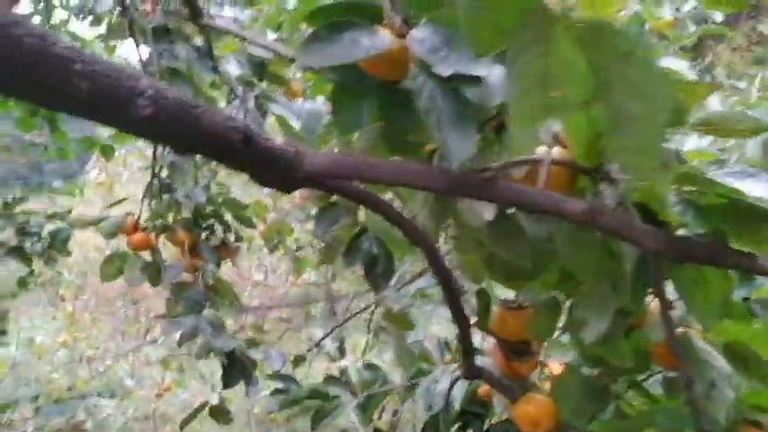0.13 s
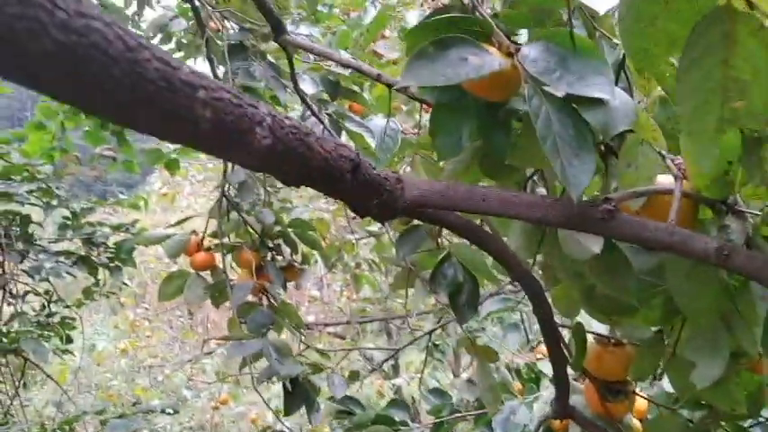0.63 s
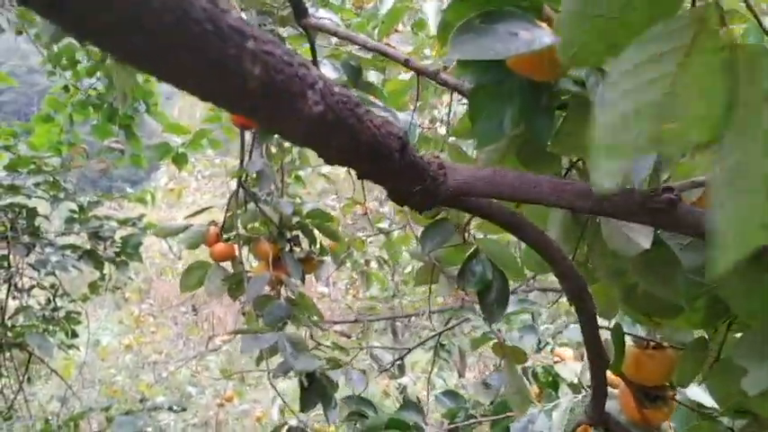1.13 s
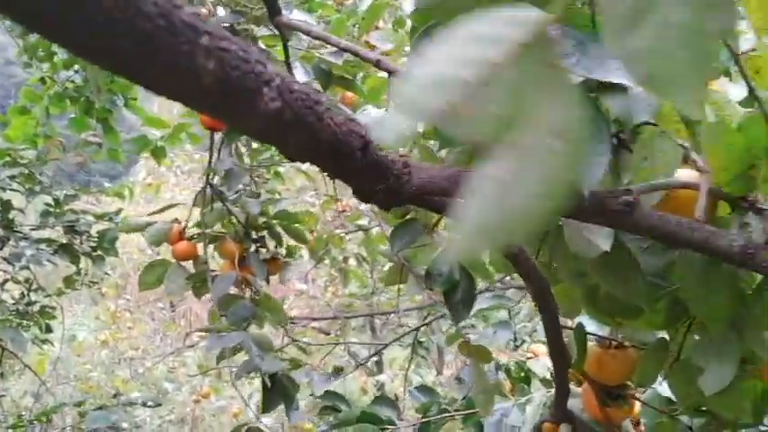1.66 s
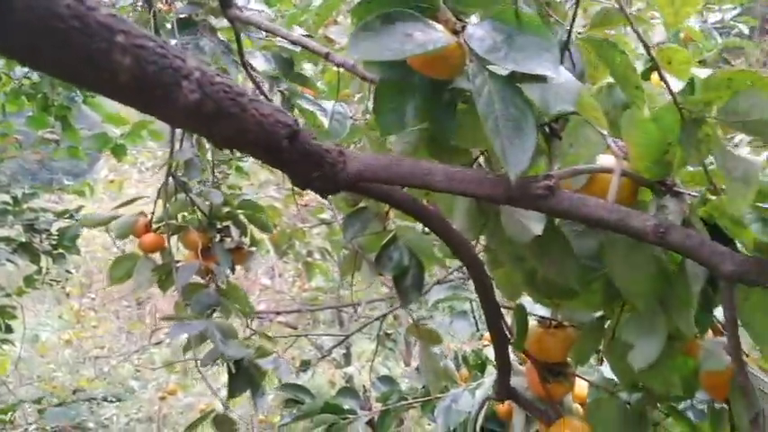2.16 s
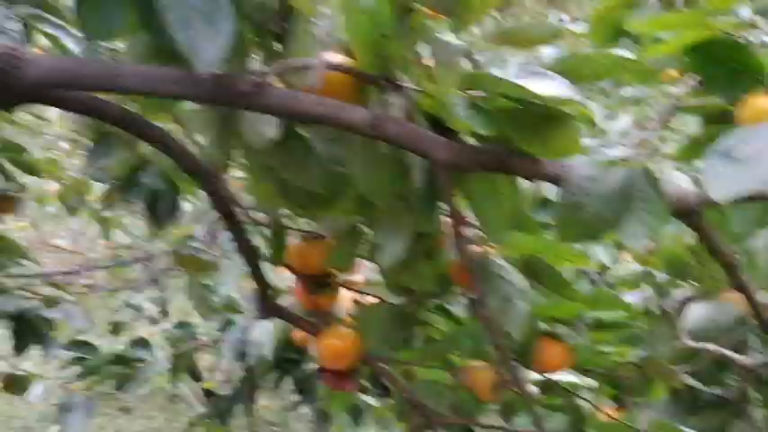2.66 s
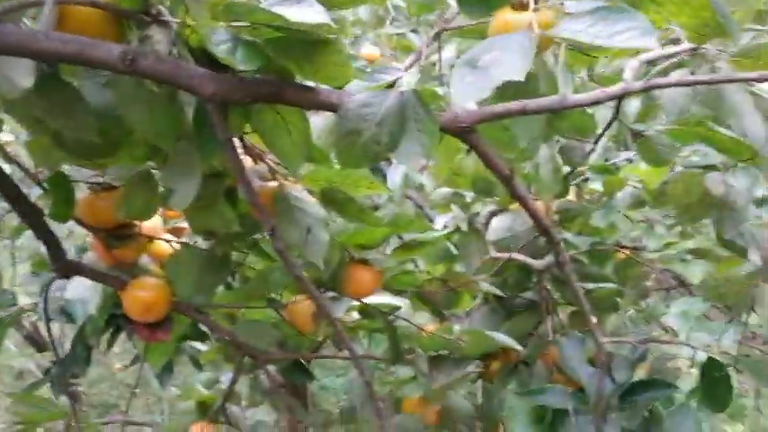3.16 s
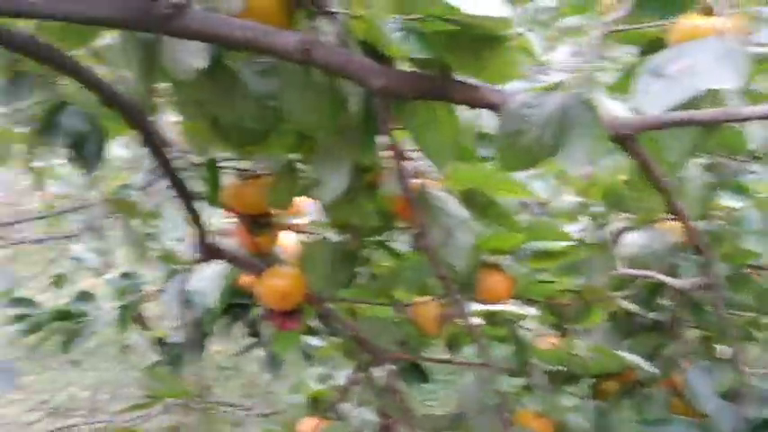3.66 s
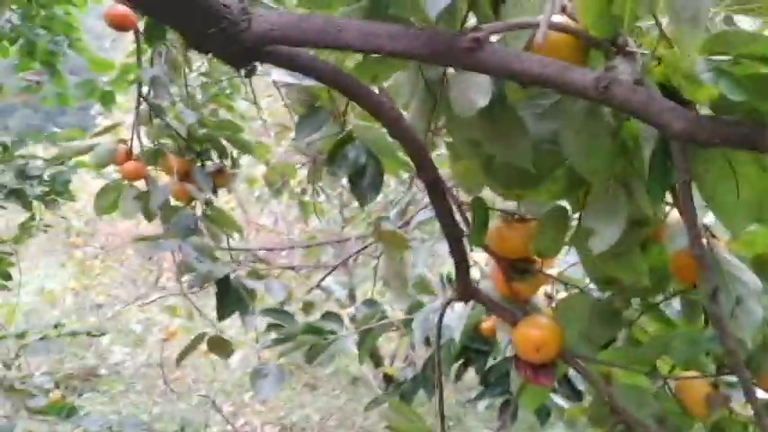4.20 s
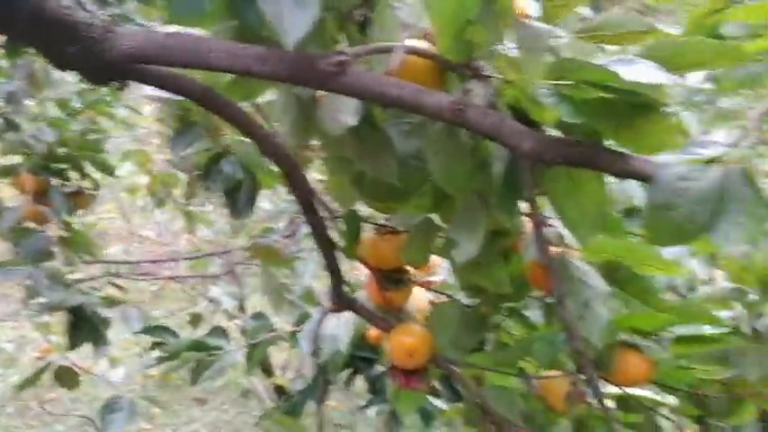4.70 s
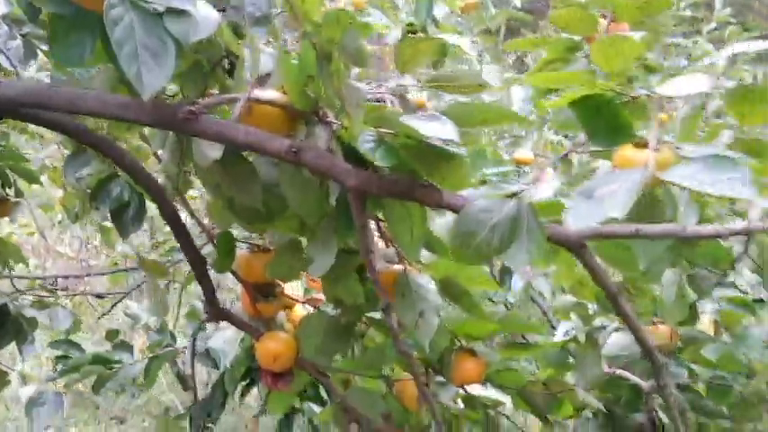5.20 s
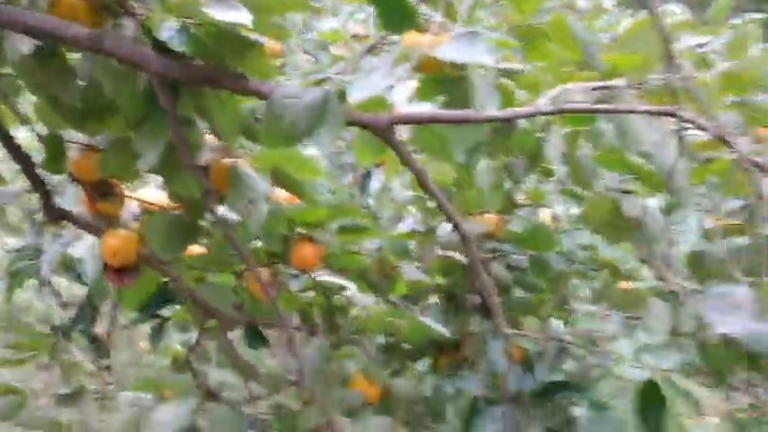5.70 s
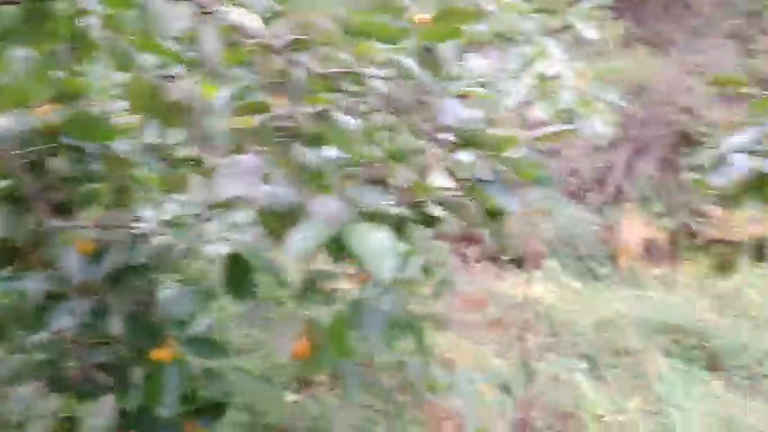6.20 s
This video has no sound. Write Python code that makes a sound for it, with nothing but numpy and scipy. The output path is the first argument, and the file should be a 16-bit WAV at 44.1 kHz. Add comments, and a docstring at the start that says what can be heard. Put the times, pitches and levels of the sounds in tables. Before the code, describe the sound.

Someone pushes through orchard branches: dry leafy brushing, small twig clicks, a single hard crack, bark scrapes and bumps, then near quiet.

```python
"""Stiff leaves of a fruit tree, pushed aside close to a small camera, brush and crackle: noise broken into
many brief contacts. Boughs scrape and bump the same way; twigs tick and snap, one loudly, as bursts of noise.
Dull low thuds of the wood, short noise pulses, mostly sound together with the snaps; rubbing stems squeak as
narrow bands of noise round one pitch. Air puffs thump mostly one microphone port at a time, over the faint
hush of open air. The camera delivers its right channel a few milliseconds late."""
import sys
import numpy as np
from scipy import signal
from scipy.fft import rfft, irfft, next_fast_len
from scipy.io import wavfile
from scipy.ndimage import uniform_filter1d, map_coordinates

SR = 44100
rng = np.random.default_rng(int(sys.argv[2]) if len(sys.argv) > 2 else 0)


def to_linear_factor(level_db):
    """Convert decibel levels (scalar or array-like) to linear amplitude factors."""
    exponent = np.asarray(level_db, float) / 20
    return 10 ** exponent


def waveform_to_disk(signal):
    """Save audio, clipped to [-1, 1], as 16-bit WAV at the path in sys.argv[1]."""
    frames = np.transpose(np.atleast_2d(signal))
    scaled = np.clip(frames, -1, 1) * 32767
    samples = np.round(scaled).astype(np.int16)
    wavfile.write(sys.argv[1], SR, samples)


N = 279594  # samples

# Motion of the brushing leaves as hands push through:
# t/s, level of the leaf body/dB, fizz over body/dB, mean left minus right/dB
LEAF_MOTION = [(0, -62, 0.5, -1.5), (.14, -52.5, 5, -4), (.3, -69.5, -3.5, -2), (.5, -77.5, 1.5, -5.5),
               (.72, -70.5, -8.5, -1.5), (.86, -62, -9, -5), (.96, -67.5, -4, -5), (1.03, -47.5, 4, 1),
               (1.1, -53.5, 3, -2.5), (1.24, -51.5, -2, -4), (1.32, -64.5, 1, -2), (1.39, -55.5, -9, 0),
               (1.47, -68.5, -7, -10), (1.53, -62, -3, -1), (1.66, -69.5, 0.5, -3), (1.75, -57, 1.5, -3),
               (1.87, -53.5, -7.5, -4.5), (2.07, -50, 1, -6.5), (2.12, -36, -.5, -5), (2.26, -42, -1.5, 0),
               (2.3, -37.5, 2.5, -1.5), (2.37, -45.5, -.5, -9), (2.47, -47.5, -1, 1.5),
               (2.58, -57.5, -.5, -1.5), (2.65, -57, -3.5, 4), (2.7, -58, -2.5, -2), (2.79, -45.5, -4, 15),
               (2.84, -60.5, -4.5, 0), (2.98, -59, 0, 5.5), (3.03, -51, 3, 4), (3.2, -57.5, 2, 7.5),
               (3.38, -61.5, 3.5, -2), (3.63, -61, 0.5, 4.5), (3.73, -44.5, 0, 0.5), (3.87, -67.5, -1, 1),
               (3.99, -73, 4, -7), (4.06, -63.5, 6, -3), (4.18, -71, -1, -1), (4.34, -76.5, -0.5, -1),
               (4.43, -66, 1.5, -2.5), (4.63, -84, -1.5, 3.5), (4.75, -66.5, 5, -3.5),
               (5.03, -56, 1.5, -8.5), (5.17, -64, 5, -5), (5.3, -75, 2, -4), (5.35, -64.5, 9.5, -1),
               (5.42, -72, -1, -8), (5.49, -59, 7, 1), (5.7, -70.5, 10, -5.5), (5.9, -65.5, 3, 0),
               (6.0, -60.5, 4.5, -4), (6.13, -80, 5.5, -1), (6.2, -72, 11, -3), (6.34, -68, 7, -4.5)]


def unit(x):
    """Normalisation: scales a signal to an rms of 1."""
    return x / np.sqrt(np.mean(x ** 2) + 1e-20)


def along(points, hz):
    """Logarithmic frequency scale: interpolates (f/Hz, value) points along it."""
    f, v = np.transpose(points)
    return np.interp(np.log(hz + 1), np.log(f + 1), v)


def curves(rows):
    """Linear interpolation in time: one value per sample for each column after t/s."""
    s, *cols = np.transpose(rows)
    return [np.interp(np.arange(N) / SR, s, c) for c in cols]


def wobble(rate):
    """Band-limited random fluctuation: a smooth curve through rate random knots a second."""
    knots = rng.standard_normal(int(N * rate / SR) + 4)
    return map_coordinates(knots, [np.arange(N) * rate / SR])


def filtered(x, response):
    """Linear filtering: multiplies the spectrum of x by a response of frequency."""
    m = next_fast_len(x.shape[-1] + 4096)
    spectrum = rfft(x, m) * response(np.fft.rfftfreq(m, 1 / SR))
    return irfft(spectrum, m)[..., :x.shape[-1]]


def sides(pan_db):
    """Interchannel level difference: left and right gains whose mean power stays 1."""
    return to_linear_factor(np.array([pan_db, -pan_db]) / 2) / np.sqrt(np.cosh(pan_db * np.log(10) / 20))


def add(out, s, sound):
    """Superposition: mixes a sound in at time s."""
    start = round(s * SR)
    out[:, max(start, 0):start + sound.shape[1]] += sound[:, max(-start, 0):]


def at_ports(pair, gain):
    """Interchannel coherence: blends two unrelated signals to a set left-right likeness, then colours them."""
    # Likeness of the two ports, highest in the low mids: f/Hz, correlation of left and right
    alike = [(50, 0.18), (200, 0.86), (800, 0.71), (1300, 0.1), (3000, 0.6), (10000, 0.3)]

    def mid_side(hz):
        turn = np.arccos(np.clip(along(alike, hz), 0, 1)) / 2
        return gain(hz) * np.array([np.cos(turn), np.sin(turn)])

    mid, side = filtered(pair, mid_side)
    return unit(np.array([mid + side, mid - side]))


def patched(x, depth_db, size):
    """Time-frequency modulation: random gain in small patches; a long window gives narrow, ringing ones."""
    z = signal.stft(x, nperseg=size)[2]
    field = uniform_filter1d(rng.standard_normal(z.shape), size=3, axis=1)
    field = uniform_filter1d(field, size=3, axis=2)
    gain_db = depth_db * np.tanh(unit(field) / 2) * 2
    return signal.istft(z * to_linear_factor(gain_db), nperseg=size)[1][:, :N]


def rustle(spectrum, contacts, spread_db, life_s, patchy_db, ringing_db):
    """Shot noise: random contacts (mean number a second) of unequal size, decaying in energy over life_s."""
    noise = patched(rng.standard_normal((2, N)), patchy_db, size=256)
    noise = patched(noise, ringing_db, size=1024)
    strength = to_linear_factor(2 * spread_db * rng.exponential(size=N).clip(0, 4))
    touch = (rng.random(N) < contacts / SR) * strength
    energy = signal.lfilter([1], [1, -np.exp(-1 / (life_s * SR))], touch)
    grains = noise * np.sqrt(energy / energy.mean() + 1.6)  # 1.6: steady rubbing under the contacts
    return at_ports(grains, lambda hz: to_linear_factor(along(spectrum, hz)))


def leaves():
    """Sliding friction of stiff leaves: shot noise in a body and a finer fizz that flutter together."""
    # Spectra of body and fizz: f/Hz, relative density/dB per Hz
    body_spectrum = [(900, -18), (1800, -4.5), (2500, -0.5), (4000, -1), (6000, -2.5), (8000, -13),
                     (11000, -34)]
    fizz_spectrum = [(4500, -15.5), (6500, 3.5), (8300, 3.5), (11600, 1.5), (16000, 0)]
    level_db, bright_db, pan_db = curves(LEAF_MOTION)
    flutter_db = 1.2 * wobble(25) + 1.4 * wobble(70)
    body = rustle(body_spectrum, contacts=560, spread_db=3, life_s=.0012, patchy_db=2.5, ringing_db=5)
    fizz = rustle(fizz_spectrum, contacts=1200, spread_db=3, life_s=.0008, patchy_db=2.5, ringing_db=2)
    brushing = body + to_linear_factor(bright_db + 1.5 * wobble(15)) * fizz
    return sides(pan_db + 4.54 * wobble(18)) * to_linear_factor(level_db + flutter_db) * brushing


def boughs():
    """Friction and impact: bark scrapes in short contacts, heavier limbs and fruit bump in duller, longer ones."""
    # Motion of the boughs: t/s, bark scrape level/dB, limb bump level/dB
    motion = [(0, -52.5, -68), (.05, -67.5, -70.5), (.23, -71.5, -69.5), (.41, -79.5, -84),
              (.8, -75, -81.5), (1.08, -77, -73), (1.31, -78, -77), (1.48, -70, -70.5), (1.78, -88, -74.5),
              (1.91, -59.5, -72), (2.05, -70.5, -71), (2.14, -45.5, -61), (2.24, -58, -60.5),
              (2.29, -47, -57), (2.54, -57, -58.5), (2.68, -75, -82), (2.76, -64, -60), (2.9, -68, -71),
              (3.07, -47.5, -61.5), (3.16, -50.5, -54), (3.23, -78, -65), (3.29, -63.5, -67),
              (3.5, -72, -68), (3.71, -57.5, -62.5), (3.83, -61, -68), (4.15, -75.5, -74.5),
              (4.47, -84, -91.5), (4.75, -76.5, -78), (5.04, -63.5, -66.5), (5.35, -79, -81),
              (5.5, -73.5, -65.5), (5.86, -70, -72), (6.08, -77, -80), (6.34, -77.5, -70.5)]
    # Spectra of scrape and bump: f/Hz, relative density/dB per Hz
    bark_spectrum = [(350, -26.5), (650, -7), (1050, -2.5), (1500, -8.5), (2000, -7.5), (3500, -35)]
    limb_spectrum = [(70, -37.5), (150, -9.5), (300, -1.5), (500, -2.5), (800, -15), (1500, -39.5)]
    scrape_db, bump_db = curves(motion)
    pan_db = 0.5 + 0.26 * curves(LEAF_MOTION)[2]  # follows a share of the leaves' side-to-side move
    scrape = rustle(bark_spectrum, contacts=250, spread_db=1.5, life_s=.005, patchy_db=2.5, ringing_db=4)
    bump = rustle(limb_spectrum, contacts=19, spread_db=1.0, life_s=.015, patchy_db=-0.5, ringing_db=3.5)
    return sides(pan_db) * to_linear_factor(1.8 * wobble(15)) * (to_linear_factor(scrape_db) * scrape + to_linear_factor(bump_db) * bump)


def ticks(count):
    """Random point process: rows of small ticks at chance times, their level tied to that of the leaves."""
    over_leaves_db, scatter_db, pan_scatter_db = 5, 2.5, 5
    centre_hz, scatter_octaves, focus_octaves = 4500, .6, .6
    length_ms, length_octaves = 1.6, 0.93
    level_db, _, pan_db = curves(LEAF_MOTION)
    when = rng.random(count) * (N - 1)
    at = when.astype(int)
    g = rng.standard_normal((count, 4))
    return np.transpose([when / SR,
                         level_db[at] + over_leaves_db + scatter_db * g[:, 0],
                         pan_db[at] + pan_scatter_db * g[:, 1],
                         centre_hz * 2 ** (scatter_octaves * g[:, 2]),
                         np.full(count, focus_octaves),
                         length_ms * 2 ** (length_octaves * g[:, 3])])


def snaps():
    """Brittle fracture: each break is a ragged, fast-decaying noise burst focused round its own frequency."""
    # Twig snaps: t/s, level/dB, left minus right/dB, crack centre f/Hz,
    # offset at which the focus is 4 dB down/octaves, time of a 12 dB decay/ms
    breaks = [(.2671, -50.5, -8, 1920, 1.5, 3.3), (.7677, -56.5, -2, 3320, 0.53, 11),
              (.8858, -54, 0, 2190, 0.85, 9.2), (.9972, -40, -4, 2760, 0.31, 1.3),
              (1.0254, -42, -4, 5560, 1.3, 18), (1.0375, -39.5, -2, 8200, .97, 3.3),
              (1.0491, -33.5, -12, 7300, 0.57, 2.4), (1.0579, -38, 8, 6100, .92, 4.5),
              (1.1383, -29, 2.5, 6050, 1.3, 6.4), (1.1489, -44, -4, 5800, 0.4, 37),
              (1.2305, -32, -3.5, 4150, 1.15, 3), (1.249, -29.5, -2, 8350, 0.44, 1.3),
              (1.2743, -34.5, 3, 5100, 1.05, 4.8), (1.4104, -33.5, -3, 4470, 1.08, 4.9),
              (1.4204, -42, -1, 2800, 1.04, 4), (1.5124, -46, -16.5, 4380, .16, 5.8),
              (1.5311, -34.5, -9, 4960, 1.14, 1.76), (1.6893, -43, -1, 4700, 0.61, 3.4),
              (1.7301, -38, -11.5, 9100, .52, 7.8), (1.8087, -51, 2, 1470, .87, 13),
              (1.8196, -36.5, -6, 1830, 0.8, 2.9), (1.9374, -41, -1.5, 6200, 1.3, 8.9),
              (2.041, -46, 11, 5000, 0.87, 5.3), (2.0969, -10, 1.5, 4900, 1.2, 3.9),
              (2.1232, -19, -5.5, 4170, 0.69, 2.3), (2.204, -27.5, -5.5, 2160, 1.3, 5.6),
              (2.4727, -48, -2.5, 3440, .89, 5.1), (2.607, -45.5, -12.5, 2440, 1.2, 14),
              (2.6386, -45, -9, 4350, 0.68, 8.1), (2.7631, -41, 6, 3040, .7, 8.2),
              (2.7835, -39.5, -3, 1140, 0.59, 6.2), (2.7935, -36.5, 24, 4800, 1.3, 2.9),
              (2.8779, -47.5, 0, 2650, .54, 3.3), (2.9182, -46, 3, 1350, 1.7, 6.6),
              (3.0127, -47, 8, 1210, 1, 15), (3.0632, -47.5, -1, 1210, 0.55, 2.7),
              (3.0746, -42, 3, 1600, 1.2, 6.7), (3.1247, -33.5, 1, 1330, .57, 4.6),
              (3.1388, -31, 1, 1500, 1.2, 1.7), (3.1473, -24.5, 6, 1990, 1.22, 5.1),
              (3.1608, -37, -1, 1860, 1.1, 10.4), (3.315, -49.5, 4, 1800, 1.54, 5.2),
              (3.3478, -47.5, 1, 6860, .31, 5.4), (3.5836, -46, -1, 4500, 0.99, 8.8),
              (3.6855, -43, 4, 2580, 0.65, 17), (3.727, -41, 7, 5400, 1.3, 4.3),
              (3.7658, -30.5, -1.5, 2800, 0.92, 9.2), (3.9467, -58, -13, 3120, 1.3, 9.3),
              (4.0149, -56, -8, 4030, 1.1, 2.8), (4.0304, -36, -4, 7370, 0.76, 7.4),
              (4.0912, -42.5, -3.5, 2355, 0.28, 6.6), (4.6912, -53, -8, 8400, .37, 14.7),
              (4.8642, -48, -4, 5300, 0.39, 7.9), (5.1814, -44.5, -6, 9800, 0.4, 16),
              (5.2073, -46.5, -5, 8650, 0.43, 8.8), (5.2644, -55, -4.5, 7950, 0.43, 7.1),
              (5.3346, -45, 1, 8550, .38, 6.7), (5.4995, -44.5, -6, 2560, 0.3, 6.9),
              (5.6695, -53.5, -1, 7900, .48, 11), (5.78, -48, -.5, 7960, .53, 23),
              (5.9685, -41.5, -3, 3960, 0.43, 2.1)]
    push_db, push_hz, push_fade = -25, 140, 1200  # air push: dB re the snap's level, Hz, dB lost a second
    out, t = np.zeros((2, N + SR)), np.arange(-400, 2600) / SR
    for s, level_db, pan_db, centre_hz, spread, length_ms in [*breaks, *ticks(count=160)]:
        life = max(length_ms, .5) / 1000
        rise = np.clip(t / (.4 * life) + .5, 0, 1) ** 2
        decay = to_linear_factor(-12 * abs(t) / life) + 0.18 * to_linear_factor(-2.5 * abs(t) / life)  # with a weak slow tail
        shape = rise * decay
        # fibres part unevenly
        ragged = to_linear_factor(2.5 * unit(uniform_filter1d(rng.standard_normal(len(t)), size=24)))

        def focus(hz):
            octaves = np.log2((hz + 50) / centre_hz)
            return to_linear_factor(-4 * (octaves / spread) ** 2) + 0.14  # over a faint wide click

        burst = rng.standard_normal((2, len(t))) * shape * ragged
        crack = at_ports(burst, focus) * np.sqrt(2) * np.std(shape)
        # the freed twig shoves the air: a damped low oscillation
        push = (t > 0) * np.sin(2 * np.pi * push_hz * t) * to_linear_factor(-push_fade * abs(t))
        add(out, s - 400 / SR, sides(pan_db)[:, None] * to_linear_factor(level_db) * (crack + to_linear_factor(push_db) * push))
    return out[:, :N]


def thuds():
    """Impulsive low-band noise: dull low thuds of the wood, Gaussian pulses, mostly together with the snaps."""
    # Thuds: t/s, level/dB, left minus right/dB, nominal length/ms (scaled below)
    pulses = [(.2671, -58, -20, 4.9), (1.0586, -54.5, 16, 7.3), (1.1386, -48, -4, 1.8),
              (1.2747, -43, -8, 2.1), (1.4201, -53, 0, 2.3), (1.5311, -55, -18, 1.8),
              (1.8184, -49.5, 1, 1.5), (2.0967, -26.5, -5.5, 5.9), (2.203, -42, -6, 3.9),
              (2.7723, -50, 4, 35), (2.7832, -49.5, 4, 14), (2.952, -50.5, 4, 6.8), (3.0749, -49, 2, 3.6),
              (3.1247, -59, -7, 6.4), (3.1473, -34, 2.5, 10), (3.1604, -41.5, 6, 10.4),
              (3.289, -44.5, 0.5, 9.5), (3.313, -46.5, 2, 12.5), (3.4831, -49.5, 1, 9),
              (3.7661, -43, 1, 11.6), (5.4919, -51.5, 2, 5.5), (5.8828, -58.5, 2, 8),
              (6.0009, -54, 2, 11.4)]
    # Spectrum of a thud: f/Hz, relative density/dB per Hz
    wood_spectrum = [(70, -34.5), (160, 1.5), (400, 1.5), (900, 0.5), (1500, -5.5), (3000, -29.5)]
    out, t = np.zeros((2, N + SR)), np.arange(-400, 2600) / SR
    for s, level_db, pan_db, length_ms in pulses:
        life = length_ms / 1000
        pulse = np.exp(-((t - 0.56 * life) / (.5 * life + .0012)) ** 2)
        noise = rng.standard_normal((2, len(t))) * pulse
        thud = at_ports(noise, lambda hz: to_linear_factor(along(wood_spectrum, hz))) * np.std(pulse)
        add(out, s - 400 / SR, sides(pan_db)[:, None] * to_linear_factor(level_db) * thud)
    return out[:, :N]


def squeaks():
    """Friction-driven resonance: grit on a rubbing stem or leaf rib excites a narrow band round one pitch."""
    # Squeaks: t/s, nominal length/s (stretched below), pitch f/Hz, level/dB, left minus right/dB
    rubs = [(.148, .012, 2650, -55.5, -14), (.801, 0.057, 2600, -72, -3), (.88, 0.035, 2150, -61, 3),
            (1.469, .011, 1550, -61, -9), (1.58, 0.085, 720, -68, -8), (1.646, 0.035, 748, -66, -9),
            (1.683, 0.03, 3160, -58, -16), (1.806, .019, 1064, -48, -6), (1.866, 0.037, 2620, -53, -5),
            (1.904, 0.035, 2720, -54, -2), (2.433, 0.038, 1118, -49.5, 6), (2.501, 0.054, 1123, -52.5, 4),
            (2.91, 0.027, 998, -56, -4), (2.939, 0.03, 1234, -55, -2), (3.011, 0.011, 1025, -57, -3),
            (3.037, 0.072, 556, -56, 11), (3.114, 0.047, 854, -44.5, -2), (3.286, 0.021, 924, -53, -3),
            (3.703, 0.063, 1013, -55, 6), (4.003, .046, 2300, -62, 2), (4.916, 0.1, 2655, -68, -1),
            (4.974, 0.051, 4470, -64, -15), (4.922, 0.039, 4170, -66.5, -15), (5.056, .14, 2660, -68.5, 0),
            (5.06, 0.023, 1315, -66, 0), (5.022, .037, 2720, -64, -10), (5.46, 0.091, 2580, -64.5, -23),
            (5.49, .036, 558, -60.5, -8), (5.518, 0.035, 1153, -61, -6), (5.529, 0.065, 494, -62, -11),
            (5.62, .1, 910, -80, -3)]
    glide = .03  # chance drift of pitch, share
    out = np.zeros((2, N + SR))
    for s, length, pitch_hz, level_db, pan_db in rubs:
        span = round(1.56 * length * SR)
        u = np.arange(span) / span
        drift = 1 + glide * rng.standard_normal() * (u - .5)
        phase = 2 * np.pi * np.cumsum(pitch_hz * drift) / SR
        knot_rate = 150 + .085 * pitch_hz  # random knots a second; more of them widen the band
        knots = rng.standard_normal((2, 120))
        grit = [map_coordinates(k, [10 + np.arange(span) * knot_rate / SR]) for k in knots]
        tone = unit((grit[0] + .15) * np.sin(phase) + grit[1] * np.cos(phase))
        swell = np.sin(np.pi * u ** 0.5)  # strongest soon after first contact
        add(out, s, sides(pan_db)[:, None] * to_linear_factor(level_db) * tone * swell)
    return out[:, :N]


def puffs():
    """Turbulent pressure: moving air thumps mainly the nearer port, as low noise under Gaussian swells."""
    # Air puffs: t/s (the swell peaks 0.02 s later), level/dB, left minus right/dB,
    # time from peak to a gain of exp(-2)/s
    gusts = [(0.976, -60.5, -4, 0.021), (1.34, -68, 9, 0.019), (1.595, -60.5, -25, 0.023),
             (1.666, -62.5, -20.0, 0.041), (1.743, -57, -23.5, 0.01), (2.41, -54.5, -27, 0.034),
             (2.483, -56, -22.5, 0.029), (2.529, -74, -11, 0.016), (3.625, -64, 20, 0.025),
             (3.94, -56, 38, 0.019), (4.235, -72.5, 26, 0.031), (4.774, -65, -8, 0.025),
             (5.323, -63, -15, 0.0065), (6.086, -67, -36.5, 0.028), (6.16, -67, -21, 0.035)]
    # Spectrum of a puff: f/Hz, relative density/dB per Hz
    puff_spectrum = [(15, -37), (40, -15), (80, -0.5), (130, -1), (250, -25.5)]
    t = np.arange(N) / SR
    swell = np.zeros((2, N))
    for s, level_db, pan_db, length in gusts:
        bell = np.exp(-((t - s - .02) / length) ** 2 * 2)
        swell += sides(pan_db)[:, None] * to_linear_factor(level_db) * bell
    colour = lambda hz: to_linear_factor(along(puff_spectrum, hz))
    air = rng.standard_normal((2, N))
    return filtered(swell * air, colour) / np.std(filtered(air, colour))


def orchard():
    """Diffuse ambient noise: the faint, nearly steady hush of the open air."""
    # Spectrum of the hush: f/Hz, relative density/dB per Hz
    air_spectrum = [(25, 4), (60, -1), (200, 1), (700, -2.5), (1800, -15), (4500, -13.5), (8000, -14),
                    (12000, -20), (16000, -19)]
    hush = at_ports(rng.standard_normal((2, N)), lambda hz: to_linear_factor(along(air_spectrum, hz)))
    return to_linear_factor(-77.0 + 0.59 * wobble(2.2)) * sides(-2.2)[:, None] * hush


def scene():
    """Superposition of all sources at the two ports."""
    return leaves() + boughs() + snaps() + thuds() + squeaks() + puffs() + orchard()


def top_cut(x):
    """Nothing passes above the cut-off."""
    return signal.sosfilt(signal.butter(12, 16660, fs=SR, output="sos"), x)


def record(dry):
    """Port response, delay and saturation: each port colours its channel, the right lags, peaks round off."""
    # Frequency responses of the two microphone ports: f/Hz, gain/dB
    left_port = [(20, -13), (60, -0.5), (1500, 3), (1900, -3), (2600, 0), (3300, 3), (4100, 2.5), (5800, 2),
                 (6500, 2), (7300, 2), (8300, 4), (9250, -2.5), (11500, 5.5), (12400, -5.5), (15500, -23),
                 (16500, -43.5)]
    right_port = [(20, -10.5), (60, -1.5), (1500, 2.5), (1900, -3), (2650, 2.5), (3400, -1.5), (4250, 4),
                  (5650, -2.5), (6300, 0.5), (8700, 5), (9250, 0.5), (9950, -11.5), (11600, 4),
                  (12400, -4.5), (15500, -21.5), (16500, -46.5)]
    right_late_s = .0039

    def response(hz):
        lag = np.exp(-2j * np.pi * hz * right_late_s)
        return np.array([to_linear_factor(along(left_port, hz)), to_linear_factor(along(right_port, hz)) * lag])

    ports = filtered(dry, response)
    rounded = ports / (1 + abs(ports / .93) ** 5) ** (1 / 5)  # never exceeds 0.93
    return top_cut(rounded)


dry = scene()
out = record(dry)
waveform_to_disk(out)
```